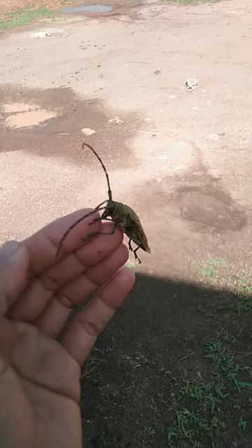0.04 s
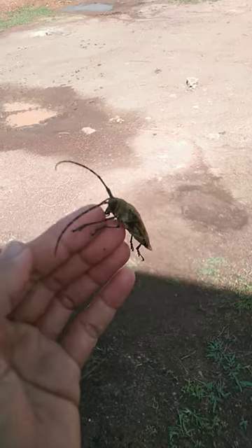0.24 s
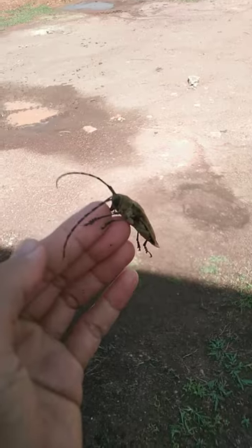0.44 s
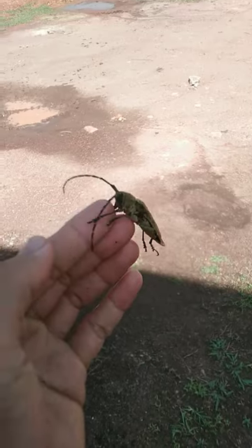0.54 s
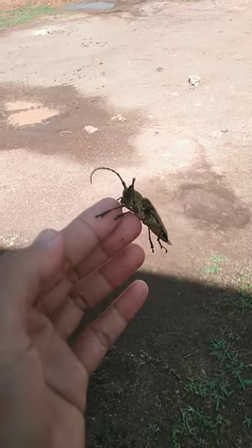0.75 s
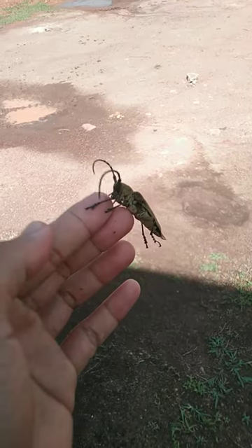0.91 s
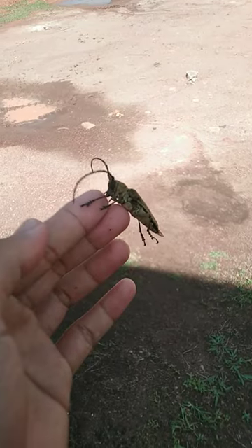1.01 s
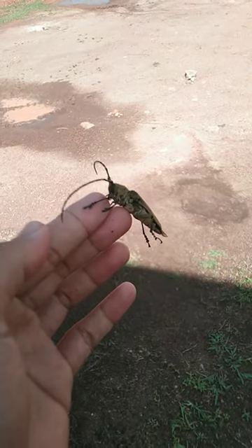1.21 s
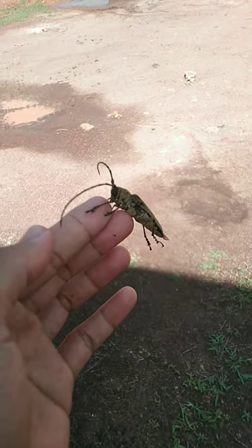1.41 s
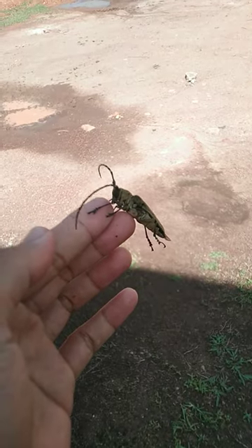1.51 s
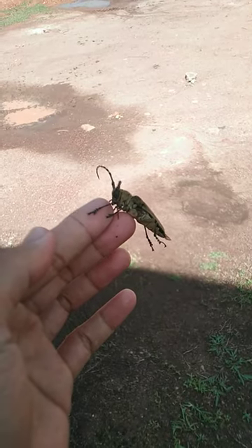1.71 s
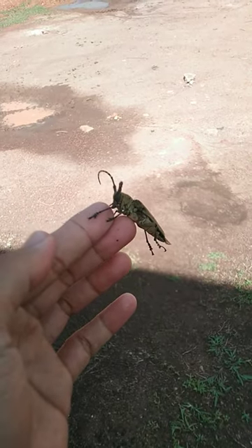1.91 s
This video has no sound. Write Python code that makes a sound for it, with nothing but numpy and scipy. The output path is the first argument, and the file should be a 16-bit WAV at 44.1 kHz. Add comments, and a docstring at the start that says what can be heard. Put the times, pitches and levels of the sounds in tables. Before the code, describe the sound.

A hand bumps and rubs the microphone while insects whine faintly behind.

```python
"""A hand shifts on a camera, close by: soft irregular bumps, a few harder thumps and a low rumble.
Each slip of the skin pushes the case, which swings back; harder contacts excite its hollow modes.
Much quieter, an insect outdoors holds a thin high note that swells, wavers and creeps upward.
Behind it lie a farther chorus of insects, faint birds and still air, made of tones and noise bands."""
import sys
import numpy as np
from scipy.fft import rfft, irfft, next_fast_len
from scipy.io import wavfile
from scipy.ndimage import map_coordinates

SR = 44100
rng = np.random.default_rng(int(sys.argv[2]) if len(sys.argv) > 2 else 0)


def waveform_to_disk(signal):
    """Save audio, clipped to [-1, 1], as 16-bit WAV at the path in sys.argv[1]."""
    frames = np.transpose(np.atleast_2d(signal))
    scaled = np.clip(frames, -1, 1) * 32767
    samples = np.round(scaled).astype(np.int16)
    wavfile.write(sys.argv[1], SR, samples)


N = 85995
SKIN_SOFTNESS = 2.08  # softer contact has less treble

# hand contacts (time [s], relative push level [dB], push frequency [Hz], relative tap level [dB])
CONTACTS = [(0.241, -20, 101, -73.5), (0.312, -24, 127, -69.5), (0.392, -16.5, 150, -59.5),
            (0.451, -6, 241, -31.5), (0.471, -7.5, 223, -32.5), (0.509, -13.5, 135, -52.5),
            (0.526, -15, 166, -46), (0.54, -20, 315, -40.5), (0.556, -20.5, 179, -59.5),
            (0.623, -17, 125, -67.5), (0.635, -26.5, 227, -64), (0.727, -18.5, 213, -48),
            (0.75, -19, 147.4, -56.5), (0.768, -12, 162, -52), (0.811, -20.5, 247, -68.5),
            (0.859, -13, 157, -52.5), (0.973, -18, 140, -68.5), (1.007, -22, 239, -46.5),
            (1.019, -14.5, 127, -67.5), (1.056, -14, 199.6, -43.5), (1.07, -13.5, 125, -53),
            (1.088, -15.5, 156, -57.5), (1.113, -18, 151, -67.5), (1.137, -20, 178, -70),
            (1.189, -18.5, 123, -65), (1.207, -19, 155.6, -71.5), (1.27, -14.5, 220, -52.5),
            (1.334, -21, 174, -61.5), (1.435, -20, 186, -63.5), (1.517, -20.5, 197, -65.5),
            (1.576, -15, 180, -63.5), (1.622, -21, 183, -63), (1.671, -18.5, 206, -60.5),
            (1.697, -13, 297, -37.5), (1.76, -20.5, 220, -50.5), (1.766, -19.5, 123, -49.5)]
def bumps(rebound_s=.007, tap_hz=553, tap_top_hz=1530, tick_hz=12000):
    """Impact excitation: each contact pushes the case and adds a tap and a tiny tick."""
    body = taps = ticks = 0
    for s, db, hz, _ in CONTACTS:
        press = push(s, hz, SKIN_SOFTNESS)
        rebound = amp(-10.5) * push(s + rebound_s, 0.83 * hz, SKIN_SOFTNESS)  # lower and weaker
        body += amp(db + 2) * (press + rebound)
    for s, _, _, db in CONTACTS:
        taps += amp(db + 11.5) * (push(s, tap_hz, softness=9.8) + hollow_ring(s) + scuff(s))
    for s, _, _, db in CONTACTS:
        ticks += amp(db - 34.5) * push(s, tick_hz, softness=400)
    dull_taps = filtered(taps, lambda f: 1 / (1 + (f / tap_top_hz) ** 10))
    return filtered(body, case_response) + dull_taps + ticks

def push(s, hz, softness):
    """Time-frequency reciprocity: the quicker a smooth pressure pulse, the higher it sounds."""
    pressure = np.zeros(N)
    near = np.arange(*np.clip([int(s * SR) - SR // 20, int(s * SR) + SR // 20], 0, N))
    u = 2 * np.pi * hz * (near / SR - s) / (softness + 1)
    phasor = np.exp(2j * np.pi * rng.random())
    pressure[near] = np.real(phasor * (1 - 1j * u) ** -(softness + 1))
    return pressure

def case_response(f, low_hz=63.8, q=0.75, top_hz=680):
    """Group delay: the case passes a low band and its bass comes late, so each bump sinks in pitch."""
    low_cut = f ** 2 / (f ** 2 - low_hz ** 2 - 1j * f * low_hz / q)
    return low_cut ** 2 / np.sqrt(1 + (f / top_hz) ** 6)

# hollow modes of the case (frequency [Hz], relative level [dB])
CASE_MODES = [(345, -4.5), (545, -10)]
def hollow_ring(s, t60_s=.02):
    """Damped free vibration: the grip quickly stills each mode and varies its pitch and strength."""
    t = np.maximum(clock() - s, 0)
    ring = 0
    for hz, db in CASE_MODES:
        size, shift = rng.standard_normal(2)
        envelope = amp(db + 0.5 * size - 60 * t / t60_s) * (1 - np.exp(-t * hz))
        ring += envelope * np.sin(2 * np.pi * hz * np.exp(0.11 * shift) * t)
    return ring

def scuff(s, t60_s=0.26):
    """Exponential decay: a faint band of noise dies away after a tap."""
    t = clock() - s
    return (t > 0) * amp(-41 - 60 * np.abs(t) / t60_s) * noise_band(1257, width_hz=940)

# strength of the rubbing (time [s], level [dB])
RUB_LEVEL = [(0, -45.5), (.09, -48), (.16, -60.5), (.32, -42), (.43, -40), (.5, -24.5), (.59, -36),
             (.82, -30), (.9, -36.5), (1.08, -24), (1.15, -40.5), (1.22, -29.5), (1.32, -36), (1.64, -36),
             (1.8, -35.5), (1.95, -42)]
# spectrum of its rumble (frequency [Hz], relative level [dB])
RUMBLE_SPECTRUM = [(20, -17.5), (40, -18), (65, -5), (100, 5.5), (200, -12), (360, -27), (600, -39),
                   (1000, -53.5), (3000, -88)]
def rubbing(slips_per_s=55, slip_hz=158):
    """Stick-slip friction: the creeping grip sheds a stream of small slips over an uneven rumble."""
    slips = 0
    for k, (late, shift, size) in enumerate(rng.standard_normal((180, 3))):
        s = (k + 0.31 * late) / slips_per_s
        slips += amp(1.5 * size) * push(s, slip_hz * np.exp(0.22 * shift), SKIN_SOFTNESS)
    muffled_slips = unit(filtered(slips, case_response))
    rumble = unit(amp(1.5 * wobble(56)) * noise(RUMBLE_SPECTRUM))
    return amp(curve(RUB_LEVEL)) * (amp(-2.5) * muffled_slips + amp(-2) * rumble)

# swells of the near insect's note (time [s], level [dB])
INSECT_LEVEL = [(0.0, -61.5), (0.108, -62), (0.2, -54.5), (0.66, -57.5), (0.7, -62.5), (0.77, -54.5),
                (0.824, -65), (0.852, -57.5), (1.384, -60.5), (1.406, -68), (1.49, -63.5), (1.542, -70.5),
                (1.58, -59.5), (1.618, -63.5), (1.672, -80.5), (1.716, -58.5), (1.808, -68), (1.872, -58),
                (1.95, -75)]
def near_insect(start_hz=5728, rise_hz_per_s=38, waver_hz=6):
    """Frequency modulation: a nearly pure note wavers and climbs, with a faint rasp around it."""
    hz = start_hz + rise_hz_per_s * clock() + waver_hz * wobble(13)
    return amp(curve(INSECT_LEVEL)) * (tone(hz) + amp(-12.5) * noise_band(hz, width_hz=53))

def second_insect(start_hz=5630, rise_hz_per_s=8.2):
    """Amplitude modulation: a thin, slowly rising note flickers at random."""
    return amp(-82.5 + 4.8 * wobble(7)) * noise_band(start_hz + rise_hz_per_s * clock(), width_hz=29)

# partials of the buzzing insect (frequency [Hz], bandwidth [Hz], level before the swell [dB])
BUZZ_PARTIALS = [(7390, 17, -78.5), (7730, 51, -76), (8086, 52, -77), (8420, 35, -84)]
# its swell (time [s], gain [dB])
BUZZ_GAIN = [(0, -4.5), (.55, 0), (1.17, 7.5), (1.55, -1), (1.95, 7.5)]
def buzzing_insect():
    """Beating: almost evenly spaced partials combine into a buzz."""
    return amp(curve(BUZZ_GAIN)) * sum(amp(db) * noise_band(hz, width) for hz, width, db in BUZZ_PARTIALS)

def insect_whine(rise_per_s=.008):
    """Proportional glide: two very high tones climb slowly at a constant interval."""
    glide = 1 + rise_per_s * clock()
    return amp(-98.5) * sum(amp(2 * wobble(8)) * tone(hz * glide) for hz in (9605, 12830))

# distant crickets (frequency [Hz], bandwidth [Hz], level [dB])
CRICKET_BANDS = [(3036, 93, -76), (3772, 120, -75.5), (3350, 270, -88)]
def crickets():
    """Narrowband noise: far crickets are heard as steady bands of blurred pitch."""
    return sum(amp(db) * noise_band(hz, width) for hz, width, db in CRICKET_BANDS)

# hiss of the insect chorus (frequency [Hz], relative level [dB])
CHORUS_SPECTRUM = [(6400, -28), (6720, -24.5), (6980, 0), (7400, -2), (7850, 6), (8150, -21), (8350, -19),
                   (9000, -35)]
# its strength (time [s], level [dB])
CHORUS_SWELL = [(0, -64), (.25, -69.5), (.8, -67), (1.55, -69.5), (1.95, -70)]
def insect_chorus():
    """Incoherent summation: many far insects are heard as one high hiss."""
    return amp(curve(CHORUS_SWELL)) * noise(CHORUS_SPECTRUM)

# far birds and insects (time [s], duration [s], frequency [Hz], bandwidth [Hz], level [dB])
CALLS = [(0, 0.13, 2390, 600, -73), (0.063, 0.09, 1850, 130, -73.5), (.09, 0.44, 5020, 380, -71),
         (0.132, 0.059, 4260, 92, -67.5), (0.307, 0.056, 4120, 70, -68.5), (.76, 0.21, 3330, 400, -78),
         (0.823, 0.11, 2500, 710, -72), (0.843, 0.36, 1998, 150, -72), (0.694, .06, 4260, 91, -78.5),
         (0.779, 0.22, 5040, 260, -79.5), (1.274, .06, 1896, 190, -72), (1.343, 0.67, 2114, 190, -79.5),
         (1.44, 0.22, 5060, 320, -81), (1.718, 0.074, 3600, 190, -75), (0, 0.18, 4581, 29, -78),
         (1.758, .24, 4640, 17, -83.5), (0.071, 0.31, 514, 13.4, -64.5), (0.268, 0.25, 733, 19, -68),
         (.62, .13, 708, 15, -72)]
def far_calls():
    """Superposition: short distant notes overlap with one high rising chirp."""
    notes = sum(amp(db) * note(s, length, hz, width) for s, length, hz, width, db in CALLS)
    chirp = amp(-66.5) * note(s=0.58, length=0.31, hz=7230, width_hz=110, rise_hz=620)
    return notes + chirp

def note(s, length, hz, width_hz, rise_hz=0):
    """Bandwidth sets tonality: a narrow call is a clean whistle, a wide one is blurred."""
    progress = np.clip((clock() - s) / length, 0, 1)
    pitch = hz + rise_hz * progress
    purity = 1 / (1 + (width_hz / 37) ** 2)  # the whistle's share of the power
    whistle = tone(pitch + width_hz / np.pi * wobble(2 / length))
    envelope = np.abs(np.sin(np.pi * progress ** 0.55))  # peaks early
    return envelope * (np.sqrt(purity) * whistle + np.sqrt(1 - purity) * noise_band(pitch, width_hz))

# still air (frequency [Hz], relative level [dB])
AIR_SPECTRUM = [(30, 14), (300, -10.5), (600, -5.5), (900, -27), (6000, -31.5), (10000, -49),
                (13500, -32.5)]
def still_air():
    """Ambient noise floor: a faint, steady hush, strongest in the bass."""
    return amp(-62.5) * noise(AIR_SPECTRUM)

def amp(db):
    """Decibels to amplitude ratio."""
    return 10 ** (np.asarray(db) / 20)

def clock():
    """Uniform sampling: the time of each sample in seconds."""
    return np.arange(N) / SR

def unit(x):
    """Normalisation to rms 1."""
    return x / np.sqrt(np.mean(x ** 2) + 1e-20)

def curve(rows):
    """Linear interpolation between (time [s], value) points."""
    return np.interp(clock(), *np.transpose(rows))

def wobble(knots_per_s):
    """Spline interpolation of random knots: a smooth wander."""
    return map_coordinates(rng.standard_normal(2000), [clock() * knots_per_s + 2])

def filtered(x, response):
    """Linear filtering: the spectrum of x times a frequency response."""
    padded = next_fast_len(N + 8192)
    return irfft(rfft(x, padded) * response(np.fft.rfftfreq(padded, 1 / SR)), padded)[:N]

def noise(spectrum):
    """Spectral shaping: noise of rms 1 following (frequency [Hz], relative level [dB]) points."""
    hz, db = np.transpose(spectrum)
    f = np.fft.rfftfreq(N, 1 / SR)
    gain = amp(np.interp(np.log(f + 1), np.log(hz), db))
    return unit(irfft(rfft(rng.standard_normal(N)) * gain, N))

def tone(hz):
    """Phase as the integral of frequency: a sine of rms 1 on a pitch curve."""
    return np.sqrt(2) * np.sin(2 * np.pi * (np.cumsum(hz) / SR + rng.random()))

def noise_band(hz, width_hz):
    """Random modulation of a carrier: a band of noise of rms 1 around a pitch."""
    f = np.fft.fftfreq(N, 1 / SR)
    white = rng.standard_normal(N) + 1j * rng.standard_normal(N)
    drift = np.fft.ifft(np.fft.fft(white) / (1 + (2 * f / width_hz) ** 2) ** 1.03)
    carrier = np.exp(2j * np.pi * np.cumsum(hz + np.zeros(N)) / SR)
    return unit(np.real(drift * carrier))

def scene():
    """Superposition: the handling adds to insects, birds and air in one channel."""
    insects = near_insect() + second_insect() + buzzing_insect() + insect_whine()
    distance = crickets() + insect_chorus() + far_calls()
    handling = bumps() + rubbing()
    return (handling + insects + distance + still_air())[None]

def record(dry, top_hz=15500):
    """Band limiting: the camera passes nothing above its top frequency."""
    return filtered(dry[0], lambda f: f < top_hz)[None]

dry = scene()
out = record(dry)
waveform_to_disk(out)
```